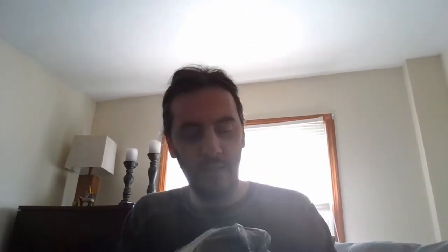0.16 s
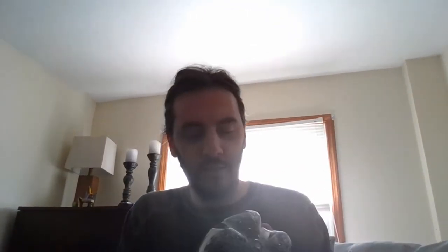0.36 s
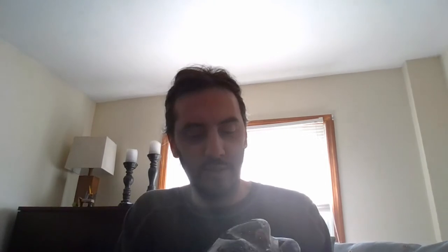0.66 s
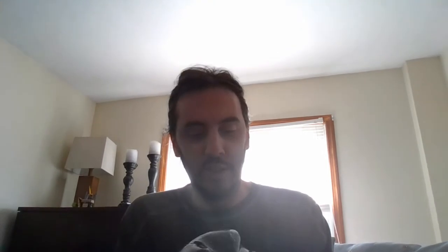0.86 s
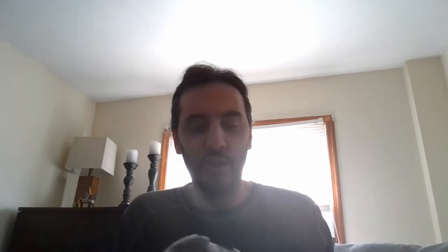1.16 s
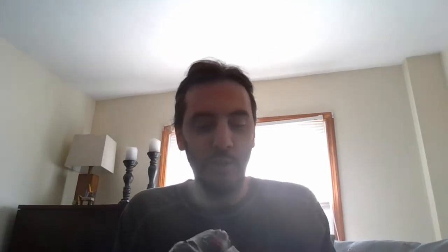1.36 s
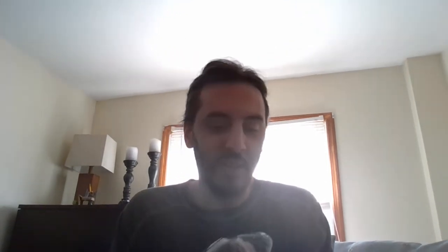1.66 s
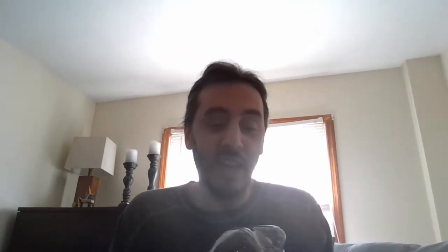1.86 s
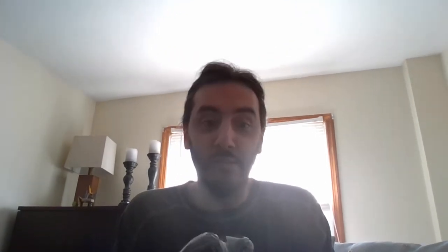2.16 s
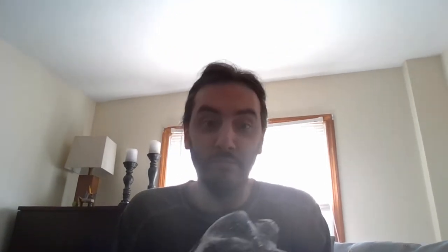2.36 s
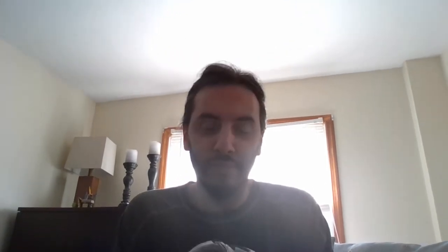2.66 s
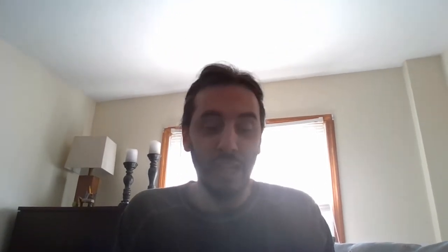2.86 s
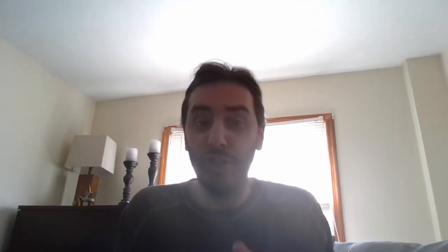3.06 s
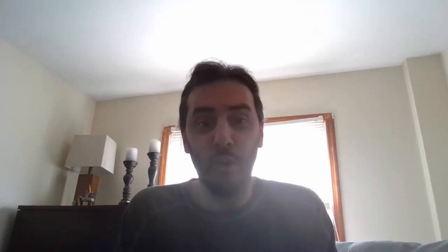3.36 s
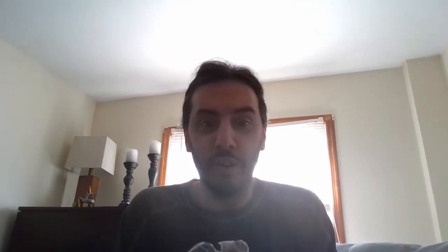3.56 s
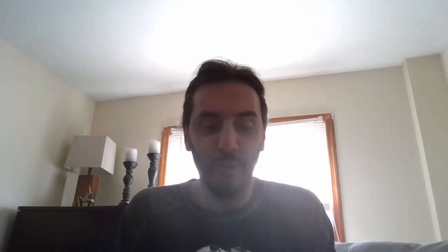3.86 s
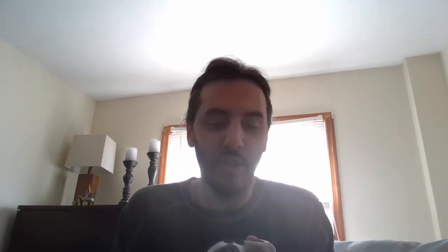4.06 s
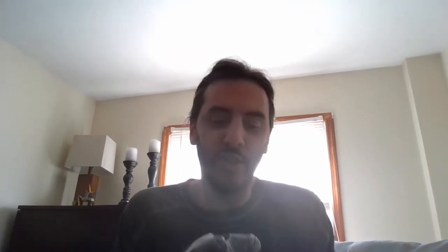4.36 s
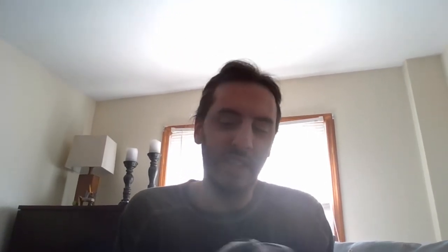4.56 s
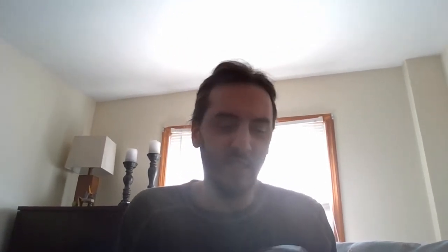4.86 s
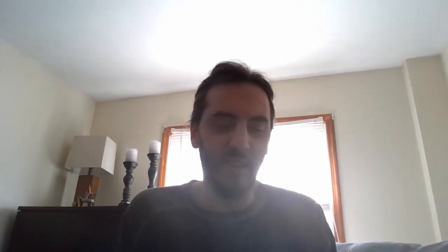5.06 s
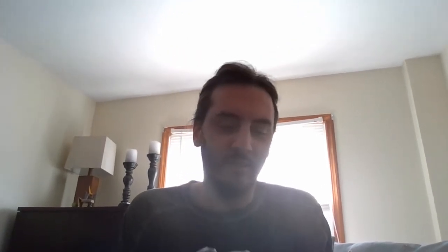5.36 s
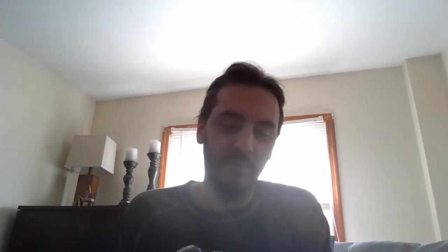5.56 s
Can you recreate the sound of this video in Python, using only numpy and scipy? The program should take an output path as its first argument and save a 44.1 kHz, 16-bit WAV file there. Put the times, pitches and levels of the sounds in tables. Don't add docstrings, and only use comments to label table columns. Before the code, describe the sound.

A thin plastic bottle crinkles under cloth in a small, slightly echoing room. Short breathy wipes mix with dry clicks, bright creasing snaps and low hollow pops of enclosed air. The strongest pops come near the first second and the end, with a quieter lull before the last flurry. Low desk rumble and faint room noise lie beneath; the microphone is close and slightly rough.

```python
import sys
import numpy as np
from scipy import signal
from scipy.fft import rfft, irfft, next_fast_len
from scipy.io import wavfile
from scipy.ndimage import uniform_filter1d, map_coordinates

SR = 44100
rng = np.random.default_rng(int(sys.argv[2]) if len(sys.argv) > 2 else 0)


def dump_mix(stems):
    frames = np.atleast_2d(stems).T
    limited = np.clip(frames, -1, 1)
    pcm = np.round(limited * 32767).astype(np.int16)
    wavfile.write(sys.argv[1], SR, pcm)


def nominal_scale(level):
    x = np.asarray(level, float) / 20
    return 10 ** x


N = 251811

# frequency in Hz, density in dB per Hz.
FIZZ = [(6500, -25.5), (7700, -3.5), (11000, -6), (14000, -2.5), (15600, -7.5), (16600, -14), (17500, -60)]
# frequency in Hz, density in dB per Hz.
CRACK = [(500, -4), (1500, -4.5), (2200, -5.5), (4500, -0.5), (6800, -3), (8000, -12), (9500, -55)]
# start in seconds, peak in dB, pitch in Hz, t60 in seconds, wall modes in dB.
POPS = [(0.99, -2.5, 312.5, 0.057, -18), (1.2305, -6.5, 321, 0.031, -19.5), (1.684, -7, 322, 0.053, -13),
        (1.685, -15.5, 425, 0.099, -9.5), (1.707, -19, 392, 0.039, -20), (1.719, -12.5, 285, 0.058, -19),
        (2.134, -12, 314, 0.042, -10), (3.518, -11, 280, 0.046, -12), (3.674, -17, 286, 0.066, -14),
        (4.003, -20.5, 289, 0.065, -13.5), (4.96, -15.5, 313, 0.031, -23), (5.653, -11.5, 230, 0.041, -2),
        (5.669, -6.5, 257, 0.033, -31), (5.682, -13.5, 226, 0.048, -0.5)]
# start in seconds, peak in dB, pitch in Hz, wall modes in dB.
DIMPLES = [(0.351, -29.5, 316, -10), (0.665, -26.5, 317, -10.5), (1.038, -31, 467, -11),
           (1.392, -30, 179, -14), (1.902, -30, 273, -10.5), (1.936, -24, 296, -11.5),
           (2.174, -26, 305, -14), (2.403, -24.5, 286, -17.5), (2.866, -34.5, 166, -16),
           (3.295, -29.5, 302, -6), (3.3, -30.5, 168, -38), (3.351, -30.5, 190, -14),
           (3.559, -30.5, 282, -18), (3.652, -23.5, 305, -21), (3.74, -28.5, 230, -6),
           (4.006, -22, 191.5, -15), (4.135, -36, 225, -13), (4.742, -30, 184, -11.5),
           (5.081, -32, 307, -22), (5.1, -28.5, 307, -6), (5.168, -23, 288, -26), (5.182, -24.5, 296, -12),
           (5.302, -27.5, 293, -11), (5.435, -39, 570, -2), (5.484, -39.5, 616, -7.5),
           (5.244, -36.5, 189, 0), (1.688, -17.5, 502, -31), (1.7067, -15.5, 224, -25)]


def unit(x):
    return x / np.sqrt(np.mean(x ** 2, axis=-1, keepdims=True) + 1e-20)


def along(points, hz):
    f, v = np.transpose(points)
    return np.interp(np.log(hz + 1), np.log(f + 1), v)


def wobble(rate):
    knots = rng.standard_normal(int(N * rate / SR) + 4)
    return map_coordinates(knots, [np.arange(N) * rate / SR])


def filtered(x, response):
    m = next_fast_len(x.shape[-1] + SR // 4)
    return irfft(rfft(x, m) * response(np.fft.rfftfreq(m, 1 / SR)), m)[..., :x.shape[-1]]


def modes(table):
    def resonator(f, centre, width):
        return 1j * f * width / (centre * centre - f * f + 1j * f * width)

    return lambda f: sum((-1) ** k * nominal_scale(db) * resonator(f, centre, width)
                         for k, (centre, width, db) in enumerate(table))


def colour(points):
    return lambda f: nominal_scale(along(points, f))


def place(out, s, sound):
    out[round(s * SR):][:len(sound)] += sound


def room_tone():
    # frequency in Hz, density in dB per Hz.
    air = [(15, -74.5), (25, -69), (92, 4.5), (293, -3), (420, -16.5), (796, -15.5), (1040, -43),
           (1610, -24), (4740, -29), (14400, -44), (16000, -40)]
    return nominal_scale(-56) * unit(filtered(rng.standard_normal(N), colour(air)))


def shuffle():
    t = np.arange(N) / SR
    level = nominal_scale(-36.5 - 60 * t / 0.9) + nominal_scale(-59)
    for s, db, *_ in POPS + DIMPLES:
        if db > -31:
            after = np.maximum(t - s, 0)
            level += nominal_scale(-38.5 + 0.57 * (db - 4) - 60 * after / 0.33) * (1 - np.exp(-after / 0.0036))
    desk = filtered(rng.standard_normal(N), modes([(121.5, 68, 0)]))
    return level * unit(filtered(desk, modes([(100, 144, 0)])))


def strokes():
    # start in seconds, length in seconds, rub in dB, fizz in dB.
    wipes = [(0.023, 0.093, -55, -17), (0.135, 0.059, -56, -24), (0.269, 0.14, -31.5, -15.5),
             (0.303, 0.065, -24, -15), (0.404, 0.23, -33.5, -14.5), (0.692, 0.071, -38.5, -9.5),
             (0.973, 0.033, -37, -44), (1, 0.033, -40, -43), (1.164, 0.051, -40.5, -13),
             (1.209, 0.016, -39, -2.5), (1.346, 0.071, -55.5, 2), (1.535, 0.13, -45.5, -17),
             (1.698, 0.036, -36.5, -16), (1.77, 0.079, -46.5, -13), (1.881, 0.11, -49.5, -8.5),
             (2.018, 0.017, -57, -20), (2.137, 0.094, -44, -19), (2.343, 0.11, -40.5, -17.5),
             (2.48, 0.08, -50, -30), (2.651, 0.11, -40.5, -15), (2.793, 0.12, -37.5, -17),
             (3.111, 0.16, -45.5, -12), (3.27, 0.043, -43, -15), (3.265, 0.13, -46.5, -26),
             (3.473, 0.095, -43.5, -9), (3.647, 0.043, -34.5, -11), (3.704, 0.13, -42, -11),
             (3.8, 0.43, -60.5, -17), (3.926, 0.11, -39, -13.5), (4.088, 0.1, -62, -14),
             (4.747, 0.036, -38, -19), (4.939, 0.058, -38.5, -12), (5.026, 0.14, -46, -12),
             (5.153, 0.088, -45, -16), (5.283, 0.11, -35.5, -17), (5.396, 0.089, -48.5, -12),
             (5.56, 0.14, -45, -19), (5.635, 0.067, -30.5, -20)]
    out = np.zeros((3, N + SR))
    for s, length, db, fizz_db in wipes:
        u = np.linspace(0, 1, round(length * SR))
        press = nominal_scale(db) * np.sin(np.pi * u ** 1.14) ** 1.16
        bright = np.clip(.44 + 1.2 * length + .015 * (db + 44.5), .02, .98)
        parts = np.array([[1 - bright], [bright], [nominal_scale(fizz_db)]])
        out[:, round(s * SR):][:, :len(u)] += press * parts
    return out[:, :N]


def patches(x, depth_db):
    z = signal.stft(x, nperseg=256)[2]
    field = uniform_filter1d(rng.standard_normal(z.shape), size=4, axis=0)
    field = uniform_filter1d(field, size=10, axis=1)
    return signal.istft(z * nominal_scale(depth_db * field / field.std()), nperseg=256)[1][:N]


def rubbing():
    # time in seconds, slide in dB, squeeze in dB, grip near the neck in dB.
    motion = [(0.0, -53.5, -42, -56), (0.27, -65, -50.5, -62), (0.4, -71, -65, -85), (0.518, -43, -44, -46),
              (0.74, -42.5, -50.5, -49.5), (0.92, -57.5, -54, -57), (1.3, -48.5, -49.5, -53),
              (1.85, -53.5, -46.5, -64), (2.13, -57.5, -44, -56), (3.05, -52, -62.5, -71),
              (3.27, -45, -53.5, -45), (3.46, -70, -52, -70), (3.62, -38.5, -32, -36),
              (3.83, -57, -48, -59.5), (4.45, -58.5, -60, -62.5), (4.88, -51.5, -55.5, -50.5),
              (5.05, -51.5, -41, -42), (5.61, -57.5, -54, -45)]
    # frequency in Hz, density in dB per Hz.
    rub = [(290, -54), (500, -1), (759, -6), (1170, 7.5), (1510, -2.5), (1940, -0.5), (3270, 0.5),
           (3990, 2), (6800, -3.5), (8000, -15.5), (10400, -29), (17600, -120)]
    # frequency in Hz, width in Hz, level in dB.
    belly_modes = [(189.5, 48, -6.5), (304, 31.7, 0), (427, 16.4, -9), (506, 50, -18.5)]
    upper_modes = [(570, 167, 3.5), (1026, 200, 4.5), (2065, 410, 0.5)]
    shell_modes = [(1924, 120, 4.5), (3990, 97, -4), (5240, 110, -1), (6150, 640, 4.5)]
    s, *cols = np.transpose(motion)
    rub_db, hum_db, hollow_db = [np.interp(np.arange(N) / SR, s, c) for c in cols]
    dull, bright, fine = strokes()
    grip = 1.2 * wobble(22) + 2 * wobble(140)

    ticks = (rng.random(N) < 300 / SR) * nominal_scale(np.minimum(3 * rng.exponential(size=N), 6))
    catch = 1 + .6 * uniform_filter1d(ticks, size=12) * 12
    drive = catch * rng.standard_normal((4, N))

    def low_colour(f):
        return colour(rub)(f) / (1 + (f / 3500) ** 4) / (1 + (900 / (f + 1)) ** 2)

    def high_colour(f):
        return colour(rub)(f) * (1 - 1 / (1 + (f / 2600) ** 4))

    light = 0.68 * nominal_scale(rub_db)
    hiss = (light + 1.53 * dull) * unit(filtered(drive[0], low_colour))
    hiss += (light + 0.78 * bright) * unit(filtered(drive[3], high_colour))
    fizz_db = -62 + 0.82 * (rub_db + 57)
    fizz = (nominal_scale(fizz_db - 6.5) + fine) * unit(filtered(drive[1], colour(FIZZ)))
    shell = nominal_scale(-26) * (bright / nominal_scale(-23)) ** 1.54 * unit(filtered(drive[0], modes(shell_modes)))

    hollow = unit(filtered(drive[2], lambda f: modes(upper_modes)(f) ** 2))
    hollow *= (nominal_scale(hollow_db - 6.5) + nominal_scale(-4.5) * dull) * nominal_scale(1.6 * grip)
    push = nominal_scale(2.6 * wobble(25) + 1.2 * wobble(7)) * rng.standard_normal(N)
    hum = unit(filtered(filtered(push, modes(belly_modes)), modes([(307, 1250, 0)])))
    hum *= (nominal_scale(hum_db) + nominal_scale(0.5) * dull) * nominal_scale(0.21 * grip)
    return nominal_scale(grip - 3.5) * patches(hiss + fizz + shell, depth_db=2.5) + hollow + hum


def pricks():
    # start in seconds, peak in dB, fizz in dB.
    clicks = [(0.092, -43, -3), (0.1963, -48, -8), (0.326, -30, 6), (1.204, -45, 4), (1.24, -38, -6),
              (1.309, -39, -4), (1.9274, -28.5, -13), (2.079, -37.5, -10), (2.3632, -36, -7),
              (2.4127, -37, -22), (2.537, -32.5, -15), (2.6022, -38, -20), (2.7737, -39, -10),
              (3.118, -37, -11), (3.171, -34, -9), (3.2913, -27, -8), (3.4, -47, -7), (3.497, -28.5, 3),
              (3.5827, -38, -4), (4.1272, -50, -7), (4.3365, -57, -12), (4.3977, -69, -10),
              (4.717, -42, -14), (4.7505, -42, -6), (4.7673, -31, -4), (4.8685, -43, -15),
              (4.8988, -39, -23), (4.9549, -22.5, -15), (5.02, -42, -11), (5.0376, -39, -8),
              (5.2743, -38, -4), (5.2997, -34, -7), (5.3147, -27, -17), (5.336, -25, -8), (5.357, -35, -6),
              (5.578, -41, -7), (5.619, -35, -14)]
    out, t = np.zeros(N + SR), np.arange(SR // 40) / SR
    noise = rng.standard_normal((len(clicks), 2, len(t)))
    body = unit(filtered(noise[:, 0], lambda f: colour(CRACK)(f) / (1 + (2500 / (f + 1)) ** 4)))
    fizz = unit(filtered(noise[:, 1], colour(FIZZ)))
    for (s, db, fizz_db), a, b in zip(clicks, body, fizz):
        place(out, s, nominal_scale(db - 60 * t / 0.0037) * (a + nominal_scale(fizz_db) * b))
    return out[:N]


def snaps():
    # start in seconds, peak in dB, fizz in dB, hollow air in dB.
    neck = [(0.166, -39, -11, -11), (0.5472, -21.5, -15, -28), (0.6105, -21.5, -6, -27),
            (0.6644, -15, -6.5, -11), (0.9888, -6, -48, -46), (1.2315, -51, -34, -1),
            (1.3912, -20.5, -19, -13), (1.7702, -30.5, -15, -2), (2.5946, -32.5, -32, -9),
            (2.6658, -27.5, -6, -5.5), (2.7148, -36.5, -32, 7), (3.2989, -24.5, -11, -1),
            (3.498, -42, 0, 1), (3.5183, -18.5, -20, -4), (3.7436, -18.5, -11.5, -4), (4.417, -34, -7, -8),
            (4.761, -19.5, -3.5, -7.5), (4.9574, -18.5, -36, 4), (5.037, -31, -23, 3.5),
            (5.1017, -27.5, -13, 2), (5.1682, -26.5, -6, -7), (5.249, -24, -8, -23),
            (5.3099, -18.5, -12, -4), (5.449, -25.5, -10, -17), (5.6139, -28.5, -14, 1),
            (5.6758, -21, -19, -4), (5.6826, -7.5, -19, -13)]
    waist = [(0.2937, -29, -11, -25), (0.3176, -28, 0, -27), (0.817, -32, -8, -28),
             (0.8572, -25.5, -18, -10.5), (1.218, -29.5, -12, -3), (1.679, -23, -16, -1),
             (1.707, -30, -33, 7.5), (1.719, -20, -40, -29), (1.8032, -35.5, -5, -7),
             (1.9182, -29, -4, -28), (1.942, -27, -8, -24), (2.1055, -19, -6, -5.5), (2.1343, -20.5, -5, 4),
             (2.529, -29.5, -17, -16), (2.5539, -32, -12, -19), (3.346, -33.5, -1, -23),
             (3.558, -27, -22, -3), (3.6126, -24, -13, -24), (3.632, -22, -10, -9), (3.709, -24, -11, -10),
             (4.247, -35, -12, -1), (4.6162, -36, -13, -12), (4.8134, -31, -9, -18),
             (5.435, -27.5, -11, -15), (5.644, -14.5, -13.5, -16)]
    ribs = [(0.5728, -26, -21, -29), (0.9628, -32, -12, -11), (0.976, -35, -6, -7),
            (1.188, -26.5, -2, -3.5), (1.3532, -25.5, -22, -5), (1.5921, -27, -33, 3.5),
            (2.083, -36, -6, -12), (2.1506, -23, -9, -25), (2.3986, -26.5, -16, 3), (3.274, -31, -11, -30),
            (3.391, -42, -8, -16), (3.471, -40, -6, -24), (3.4827, -24, -5, -11), (3.6523, -14, -15, -12),
            (3.677, -19, -17, -0.5), (3.808, -30, -4.5, -1), (3.984, -20, -12, -8), (4.897, -43, -22, -23),
            (5.2071, -28, -4, -10)]
    # start in seconds, peak in dB, ring in Hz, fizz in dB.
    small = [(0.273, -37, 1300, -18), (0.4334, -43, 5000, -12), (0.4636, -33, 2760, -16),
             (0.515, -25, 4060, -5), (0.927, -38, 4000, -15), (1.5105, -33, 1880, -16),
             (1.8937, -37, 4700, 0), (2.0128, -36, 3540, -12), (2.3506, -36.5, 4550, -19),
             (2.8015, -49, 4390, -17), (2.812, -31, 4470, -19), (2.9388, -32.5, 4020, -15),
             (2.9892, -40, 4370, -28), (3.1428, -40, 2290, -22), (3.322, -36, 4560, -16),
             (3.539, -28, 4060, -5), (3.547, -30, 4800, -4), (3.575, -38, 5960, -2),
             (3.761, -31, 6570, -12), (3.998, -24.5, 4480, -15), (4.3969, -65, 4150, -14),
             (4.6523, -38, 2200, -4), (4.7045, -40, 2140, -8), (4.7217, -40, 5700, -18),
             (4.736, -34.5, 1900, -17), (5.0133, -36, 1680, -19), (5.242, -29, 2130, -12),
             (5.2864, -30, 5100, -8), (5.303, -32, 4470, -12), (5.4046, -38, 4720, -14),
             (5.482, -29.5, 1880, -10), (5.587, -33, 1290, -12), (5.6223, -32, 2100, -19)]
    out, t = np.zeros(N + SR), np.arange(SR // 12) / SR
    creases = [(hz, *row) for hz, part in [(1980, neck), (3555, waist), (4690, ribs)] for row in part]
    creases += [(hz, s, db, fizz_db, -41) for s, db, hz, fizz_db in small]
    noise = rng.standard_normal((len(creases), 2, len(t)))
    chance = rng.random((len(creases), 2))
    crack_decay = nominal_scale(-60 * t / 0.012) + nominal_scale(-16 - 60 * t / 0.088)
    fizz_decay = nominal_scale(-60 * t / 0.0067) + nominal_scale(-32 - 60 * t / 0.13)
    onset = 1 - np.exp(-t / 0.0004)
    for (hz, s, db, fizz_db, hollow_db), (a, b), (u, v) in zip(creases, noise, chance):
        hz = hz * (1 + 0.13 * (2 * u - 1))
        edge = 7000 * nominal_scale(0.28 * (fizz_db + 17.5))
        crack = crack_decay * unit(filtered(a, lambda f: colour(CRACK)(f) / (1 + (f / edge) ** 4)))
        ring = np.sin(2 * np.pi * (hz * t + u)) + .6 * np.sin(2 * np.pi * (1.43 * hz * t + v))
        ring *= nominal_scale(-60 * t / .011)
        fizz = nominal_scale(fizz_db + 6) * unit(filtered(b, colour(FIZZ))) * fizz_decay
        hollow = np.sin(2 * np.pi * (940 + 140 * v) * t)
        hollow += nominal_scale(1.5 - 60 * t / 0.0079) * np.sin(2 * np.pi * 1420 * t)
        hollow *= nominal_scale(hollow_db + 4 - 60 * t / 0.028)
        place(out, s, nominal_scale(db - 8) * (crack + 1.41 * ring + fizz + hollow) * onset)
    return out[:N]


def thumps():
    # frequency in Hz, level in dB, t60 in seconds.
    wall_modes = [(205.3, -2, 0.094), (394, 5.5, 0.037), (489.8, -5.5, 0.11), (574.5, -1, 0.045),
                  (645, -4.5, 0.078), (1005, -9.5, 0.066)]
    out, t = np.zeros(N + SR), np.arange(SR // 4) / SR
    dents = POPS + [(s, db, hz, 0.07, wall_db) for s, db, hz, wall_db in DIMPLES]
    chance = rng.standard_normal((len(dents), len(wall_modes), 2))
    push_s = 0.0032
    puff = nominal_scale(-11) * (1 - t / push_s) * np.exp(-t / push_s)
    onset = 1 - np.exp(-t / 0.0041)
    for (s, db, hz, t60, wall_db), row in zip(dents, chance):
        ring = nominal_scale(-60 * (t / t60) ** 1.38) * np.sin(2 * np.pi * hz * t)
        wall = np.zeros(len(t))
        for (f, level, life), (p, q) in zip(wall_modes, row):
            wall += nominal_scale(level + 3 * p - 60 * t / life) * np.sin(2 * np.pi * f * (1 + 0.025 * q) * t)
        place(out, s, nominal_scale(db + 1.5) * (ring + nominal_scale(wall_db) * wall - puff) * onset)
    return out[:N]


def spikes():
    # start in seconds, peak in dB, centre in Hz.
    flips = [(0.548, -19, 4500), (0.575, -22, 5000), (0.6115, -26, 3500), (0.6652, -14, 4000),
             (0.858, -13, 4500), (4.4175, -30, 4500), (0.9898, -15, 2360), (0.992, -22, 3300),
             (0.9943, -26, 1900), (1.2329, -31, 1258), (2.107, -26, 4000), (2.665, -25, 4470),
             (3.4847, -25, 6000), (3.6333, -12, 4000), (3.743, -14, 4530), (4.761, -18, 6950),
             (4.8985, -42, 5000), (5.2063, -25, 4000), (5.2868, -30, 5000), (5.311, -21, 3500),
             (5.686, -4.5, 5500), (5.679, -22, 1500)]
    out, t = np.zeros(N + SR), np.arange(SR // 200) / SR
    for s, db, hz in flips:
        place(out, s, nominal_scale(db + 1.5) * np.sin(2 * np.pi * hz * t) * np.exp(-t * hz / 1.2 * 2))
    return out[:N]


def panels():
    # start in seconds, peak in dB, pitch in Hz, t60 in seconds.
    pings = [(0.5725, -22, 5070, 0.012), (0.611, -22, 2380, 0.01), (0.8575, -23, 4290, 0.0063),
             (0.857, -23.5, 2530, 0.0099), (0.984, -32, 1980, 0.029), (0.988, -8.5, 2022, 0.022),
             (0.988, -14.5, 4010, 0.014), (0.9895, -6.5, 2840, 0.01), (0.993, -20.5, 660, 0.071),
             (0.994, -17, 1026, 0.058), (1.023, -29.5, 1015, 0.022), (2.137, -22.5, 496, 0.069),
             (1.218, -29, 3540, 0.011), (1.2303, -18, 1140, 0.011), (1.67, -33, 970, 0.024),
             (1.708, -28.5, 2970, 0.012), (1.72, -27, 3190, 0.016), (2.1055, -25, 3550, 0.013),
             (2.1318, -25, 1165, 0.021), (3.659, -17.5, 4600, 0.01), (4.988, -28, 980, 0.027),
             (5.65, -22, 1150, 0.022)]
    out, t = np.zeros(N + SR), np.arange(SR // 12) / SR
    rattle = unit(uniform_filter1d(rng.standard_normal((len(pings), len(t))), size=60, axis=1))
    onset = 1 - np.exp(-t / 0.0007)
    for (s, db, hz, t60), shake in zip(pings, rattle):
        rough = 1 + .6 * shake * (1 - np.exp(-t * hz / 8))
        decay = nominal_scale(db + 2 - 60 * t / np.clip(t60, .004, .07))
        place(out, s, decay * rough * np.sin(2 * np.pi * hz * t) * onset)
    return out[:N]


def rattles():
    # start in seconds, level in dB, top in Hz, t60 in seconds.
    shivers = [
        (0.98, -21, 3530, 0.11),
        (2.134, -31, 570, 0.14),
        (3.519, -30, 970, 0.066),
        (4.957, -36, 3900, 0.04),
        (5.655, -33, 2500, 0.15),
        (2.401, -41, 320, 0.087),
        (0.991, -22, 600, 0.06),
    ]
    out, t = np.zeros(N + SR), np.arange(SR // 6) / SR
    for (s, db, hz, t60), noise in zip(shivers, rng.standard_normal((len(shivers), len(t)))):
        shiver = unit(filtered(noise, lambda f: 1 / (1 + (f / hz) ** 4) / (1 + (hz / 3 / (f + 1)) ** 4)))
        place(out, s, nominal_scale(db - 60 * t / t60) * shiver * (1 - np.exp(-t / .001)))
    return out[:N]


def room(x):
    # frequency in Hz, t60 in seconds.
    decay = [(200, 0.19), (2000, 0.18), (8000, 0.15)]
    hz, t, z = signal.stft(rng.standard_normal(SR // 2), SR, nperseg=256)
    tail = signal.istft(z * nominal_scale(-60 * t / along(decay, hz)[:, None]), SR, nperseg=256)[1]
    return signal.fftconvolve(np.pad(x, (200, 0)), tail / np.linalg.norm(tail))[:N]


def scene():
    tone, desk, hands = room_tone(), shuffle(), rubbing()
    clicks, cracks, pops = pricks(), snaps() + spikes() + panels(), thumps()
    echo = room(nominal_scale(-12) * pops + nominal_scale(-7) * cracks + nominal_scale(-15) * hands)
    return (tone + desk + hands + clicks + cracks + pops + rattles() + echo)[None]


def starve(x, step_db):
    # frame centre in seconds, loss in dB.
    starved = [(0.516, 7), (0.649, 12), (0.682, 40), (2.688, 40), (4.376, 20), (0.727, 12), (0.772, 9),
               (1.196, 19), (1.621, 17), (1.731, 15), (1.773, 12), (1.895, 9), (1.988, 11), (2.415, 4),
               (2.498, 9), (2.949, 11), (3.224, 16), (3.802, 16), (4.143, 22), (5.079, 15), (5.189, 11)]
    out, size = x.copy(), round(SR * 2048 / 48000)
    arch = np.sin(np.pi * (np.arange(size) + .5) / size)
    hz = np.fft.rfftfreq(size, 1 / SR)
    for s, loss_db in starved:
        start = round(s * SR) - size // 2
        at = slice(start, start + size)
        severe = loss_db > 35
        w = np.minimum(arch * (1.06 if severe else 1), 1)
        z = rfft(w * x[:, at])
        middle = np.sqrt(np.mean(np.abs(z[:, (hz > 1500) & (hz < 7000)]) ** 2))
        step = nominal_scale(step_db - 4.1 * (hz > 5000) + 0.23 * loss_db * (hz > 7500)) * middle
        lost = (np.abs(z) < step) & (hz > 1200) | (hz > 8000) & severe
        change = np.where(lost, nominal_scale(-loss_db) - 1, 0.2 * (hz > 1200))
        out[:, at] += w * irfft(z * change, size)
    return out


def band_limit(x):
    return signal.sosfilt(signal.butter(12, 16660, fs=SR, output="sos"), x)


def record(dry):
    sudden = [
        0.858,
        2.1066,
        2.666,
        3.261,
        3.484,
        4.417,
        4.762,
        4.96,
        5.683,
    ]
    heard = filtered(dry, lambda f: (1j * f / (70 + 1j * f)) ** 3 * (f < 16600))
    squeezed = heard / (1 + np.abs(heard / .62) ** 4) ** (1 / 4)
    heard = starve(squeezed, step_db=0.5)
    narrow = filtered(heard, lambda f: np.clip((15900 - f) / 300, 0, 1))
    opened = sum(np.exp(-((np.arange(N) / SR - s) / .004) ** 2) for s in sudden)
    return band_limit(narrow + opened * (heard - narrow))


dry = scene()
out = record(dry)
dump_mix(out)
```